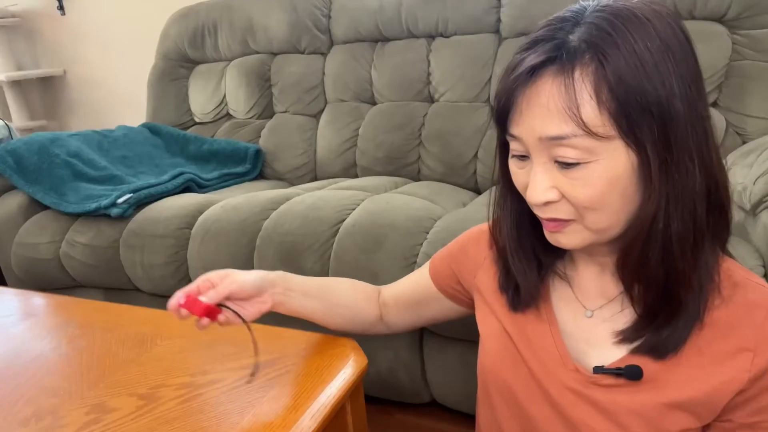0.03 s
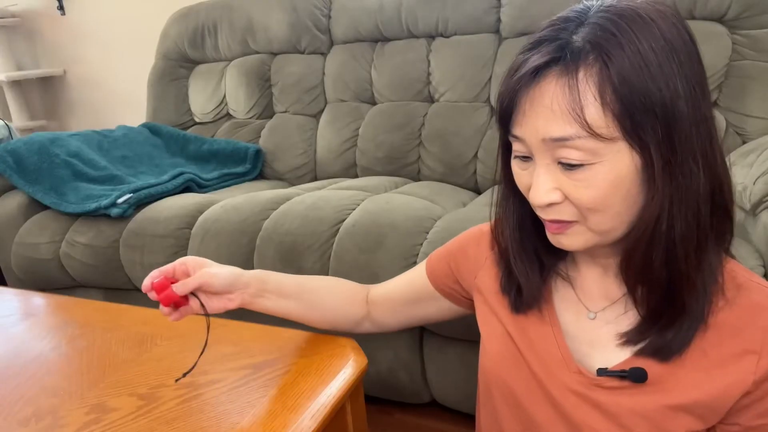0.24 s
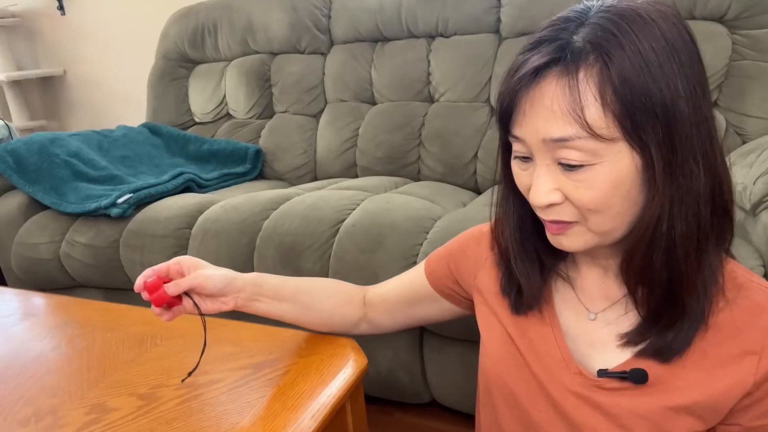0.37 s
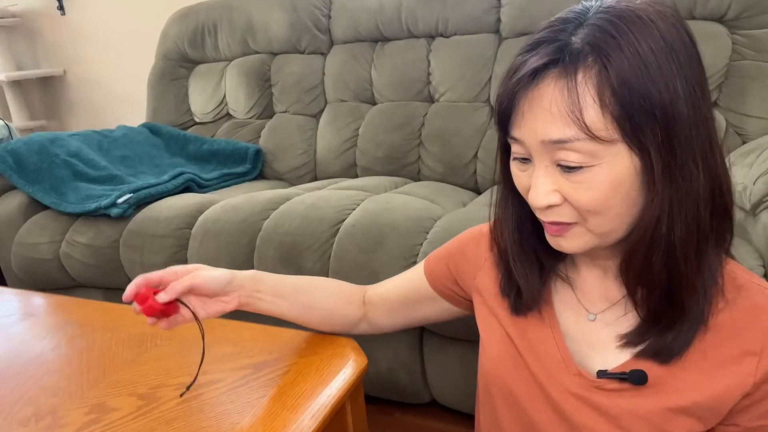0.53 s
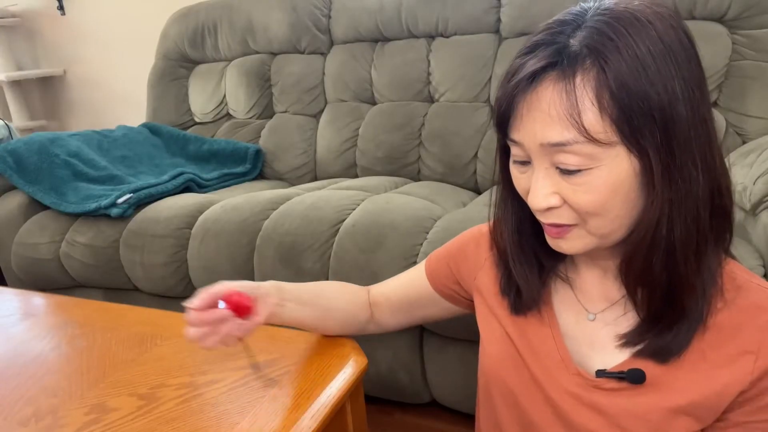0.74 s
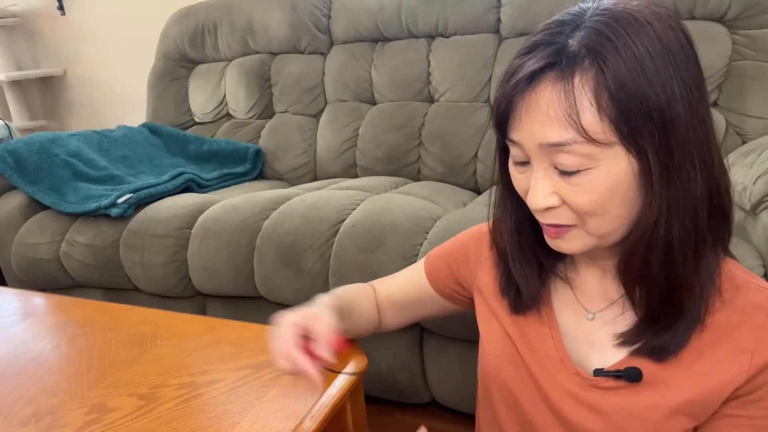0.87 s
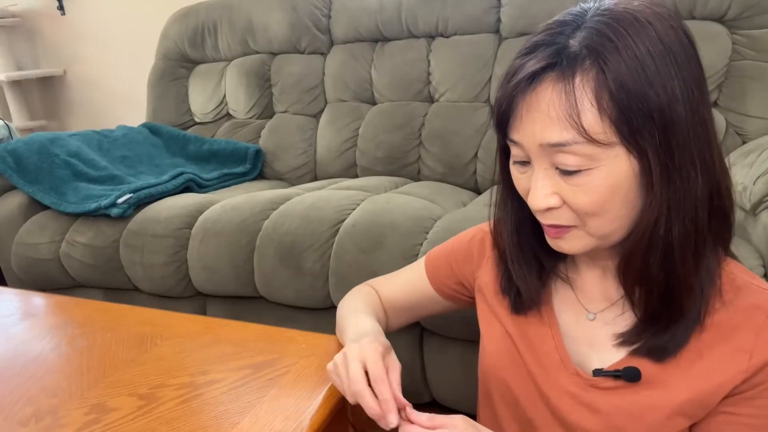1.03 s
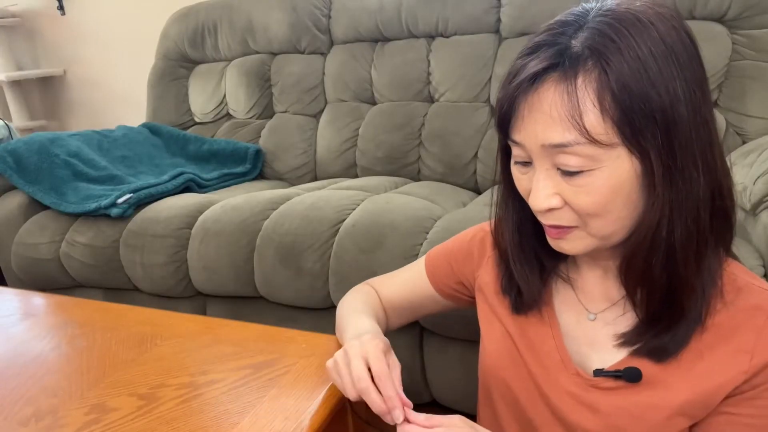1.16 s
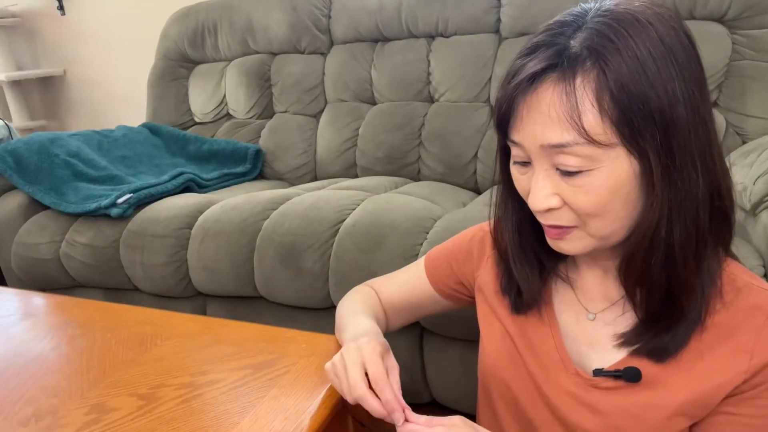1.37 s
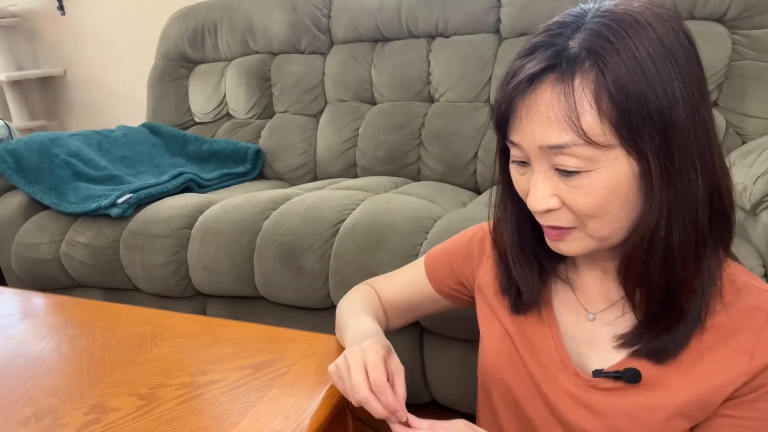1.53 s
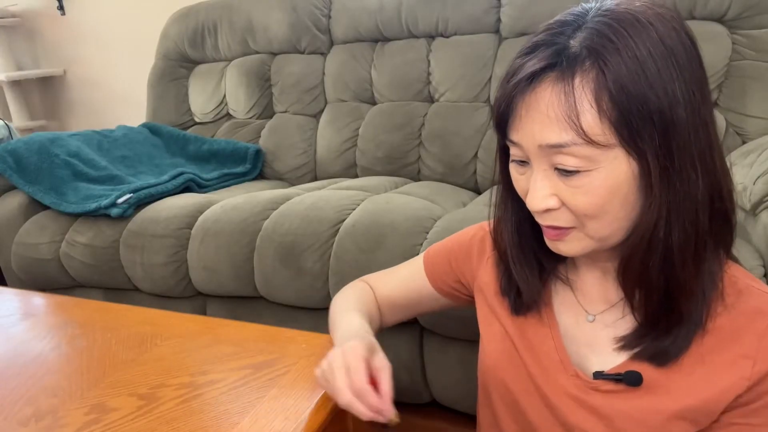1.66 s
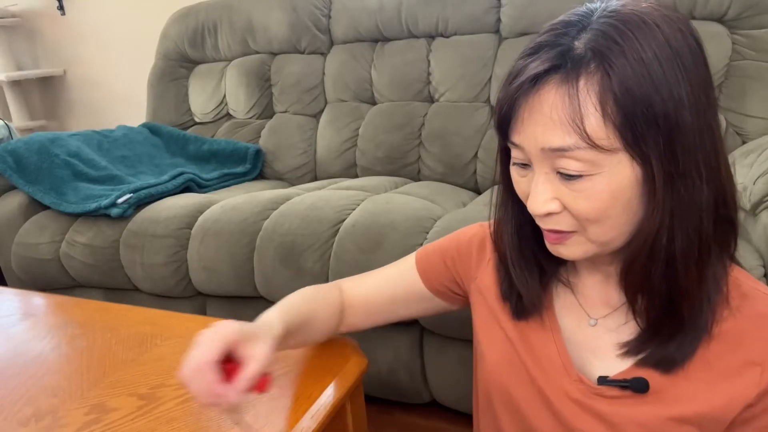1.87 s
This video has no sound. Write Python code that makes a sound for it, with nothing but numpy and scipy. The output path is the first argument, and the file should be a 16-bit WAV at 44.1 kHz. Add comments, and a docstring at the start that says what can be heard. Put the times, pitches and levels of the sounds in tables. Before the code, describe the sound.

A hand clicker snaps once, loud and sharp, close to the microphone, then springs back with a softer click. Faint handling ticks and a slight clothing rustle follow over a low hum in a quiet living room.

```python
"""A hand clicker is pressed and let go, close to the microphone in a quiet living room.
Its steel leaf buckles with a snap that overloads the recorder, then springs back more softly. Each snap
excites damped modes of the leaf and its case, and the room answers with echoes and reverberation.
Small ticks of handling, one soft boom and a faint rustle of arm movement lie over a low rumble and hum."""
import sys
import numpy as np
from scipy import signal
from scipy.fft import irfft
from scipy.io import wavfile
from scipy.ndimage import uniform_filter1d, minimum_filter1d

SR = 44100
rng = np.random.default_rng(int(sys.argv[2]) if len(sys.argv) > 2 else 0)


def generate_wav(sig):
    """Save sig (samples, or channels by samples) to the path in sys.argv[1] as 16-bit PCM at SR."""
    pcm = np.round(np.clip(np.atleast_2d(sig).T, -1, 1) * 32767).astype(np.int16)
    wavfile.write(sys.argv[1], SR, pcm)


N = 83790

# spectrum of the room noise: frequency_hz, relative_db
FLOOR_SPECTRUM = [(10, 2.5), (22, -11.5), (31, 7.5), (48, -15.5), (62, -17.5), (78, -17.5), (100, -28.5),
                  (200, -32), (400, -39.5), (800, -49.5), (2000, -59), (6000, -59), (15500, -62)]
# envelope of the deep rumble: time_s, level_db
RUMBLE_ENVELOPE = [(0, -28), (.2, -29), (.4, -40), (.55, -55), (.85, -49.5), (1.0, -35.5), (1.1, -59),
                   (1.9, -69)]
# steady tones of the hum: pitch_hz, level_db
HUM_TONES = [(79, -67), (118, -68), (239, -76), (358, -79), (414.5, -81)]
# envelope of the rustle of arm and clothes: time_s, level_db
RUSTLE_ENVELOPE = [(0, -67.5), (.55, -73), (.75, -64), (.9, -58.5), (1.0, -69), (1.15, -75), (1.41, -74.5),
                   (1.47, -64.5), (1.62, -63), (1.72, -66), (1.9, -72)]
# spectrum of sliding cloth: frequency_hz, relative_db
CLOTH_SPECTRUM = [(80, -4.5), (250, 4.5), (620, 1), (1300, -8), (2000, -8.5), (3000, -14), (8000, -16.5),
                  (15500, -21.5)]
# handling ticks, with noisy resonance, scrape and send to the walls relative to the pure ring:
# start_s, level_db, ring_hz, resonance_hz, resonance_db, t60_s, scrape_db, wall_db
HANDLING_TICKS = [(.0882, -62, 2250, 8100, 6, 0.017, -1, -8), (.0932, -47.5, 4150, 8160, -3, .016, -3, -7),
                  (.0936, -49.5, 2320, 9760, 1, .016, -13, -19),
                  (.1612, -54, 2300, 9240, 2.5, .014, -3, -11), (0.6968, -56, 1650, 6650, 2, .012, 0, -10),
                  (0.7019, -37, 3416, 5220, -3.5, 0.019, -6, 2),
                  (.7956, -43, 5050, 7190, 6.5, 0.013, -3.5, -11.5),
                  (1.008, -61.5, 2100, 13800, -2, .025, -6, 6), (1.048, -66, 1850, 13800, 2, .02, 1, -6.5),
                  (1.2725, -47.5, 1520, 1130, -5, 0.021, -15, -15),
                  (1.273, -49, 575, 3536, -11.5, 0.025, -23, -7.5),
                  (1.807, -60, 2010, 3390, 1.5, 0.041, 0, -5)]
# spectrum of the scrape in a tick: frequency_hz, relative_db
SCRAPE_SPECTRUM = [(300, -7), (1500, -11.5), (3500, 2.5), (7500, -3.5), (10000, -11.5), (16000, -18.5)]
# first reflections from table and walls: delay_s, gain_db
EARLY_ECHOES = [(.0063, -20), (0.01, -17), (.0138, -24), (.0218, -22.5), (.0272, -22)]
# reverberation by band: frequency_hz, gain_db, t60_s
ROOM_BANDS = [(300, -18.5, .3), (995, -13.5, .3), (2200, -9.5, 0.56), (3430, -9, .56), (4200, -9, 0.64),
              (6002, -12, .5), (10197, -10, .42), (11600, -14, 0.3), (15500, -13, .28)]
# modes of leaf and case as the leaf buckles: pitch_hz, relative_db, t60_s
BUCKLING_MODES = [(2151, -11.5, 0.024), (2345, -4.5, 0.019), (3566, -7, 0.017), (5090, -9, .012),
                  (5877, -7.5, 0.011), (6138, 0, .009), (7360, -10.5, .009), (8180, -11.5, .009),
                  (9130, -11.5, 0.0041), (9962, 3, 0.0085), (11716, -6.5, 0.0062), (12625, -6.5, .007),
                  (13700, -12, .008), (15440, -9, .007)]
# spectrum of the crack on the direct path: frequency_hz, relative_db
CRACK_SPECTRUM = [(150, -26), (600, -22.5), (1400, -21.5), (1900, -3.5), (2400, 0.5), (4300, 0),
                  (7000, -0.5), (10300, -1.5), (13000, -8), (16000, -4)]
# spectrum of the crack summed over all directions, as it reaches the walls: frequency_hz, relative_db
WALL_CRACK_SPECTRUM = [(300, -24.5), (1250, -18.5), (1850, -1), (2300, 4), (2900, -7.5), (3450, 4.5),
                       (4200, -3.5), (5200, 1.5), (6150, 3.5), (6900, -1), (9000, 0), (10000, 4),
                       (11000, -1), (13000, -3), (15600, -3)]
# modes of leaf and case as the leaf springs back: pitch_hz, relative_db, t60_s
RETURN_MODES = [(2260, -9, .015), (2957, -6.5, 0.021), (3660, -5.5, 0.012), (4570, -2.5, 0.0074),
                (5370, 1, 0.011), (5870, -1, 0.0091), (6900, -2, 0.01), (9500, -0.5, 0.0093),
                (10150, -6.5, 0.011), (14400, -8, 0.0093), (15450, -3, .011)]


def amp(db):
    """Amplitude ratio: a factor of ten for every 20 dB."""
    return 10 ** (np.asarray(db) / 20)


def unit(x):
    """Normalisation to rms 1."""
    return x / np.sqrt(np.mean(x ** 2) + 1e-20)


def spectrum_at(points, hz):
    """Interpolation on a log-frequency axis."""
    frequencies, values = np.transpose(points)
    return np.interp(np.log(hz + 1), np.log(frequencies + 1), values)


def envelope(points):
    """Gain over time, interpolated in decibels."""
    return amp(np.interp(np.arange(N) / SR, *np.transpose(points)))


def add(mix, start_s, sound):
    """Superposition: a sound joins the mix at start_s."""
    part = mix[max(round(start_s * SR), 0):][:len(sound)]
    part += sound[:len(part)]


def noise(gain_at, size):
    """Random-phase synthesis: noise of rms 1 with a spectrum shaped by gain_at(hz)."""
    hz = np.fft.rfftfreq(size, 1 / SR)
    return unit(irfft(gain_at(hz) * np.exp(2j * np.pi * rng.random(len(hz))), size))


def coloured_noise(spectrum, size):
    """Spectral shaping: noise of rms 1 that follows a table in decibels."""
    return noise(lambda hz: amp(spectrum_at(spectrum, hz)), size)


def rumble(pitch_hz=30.4, drift_hz=1.61, wobble_db=2.5, wobble_hz=4.5):
    """Slow random modulation of pitch and level makes a deep tone lumpy as it swells and fades."""
    drift, lumps = (noise(lambda hz: np.exp(-hz / wobble_hz) * (hz > 0), N) for _ in range(2))
    cycles = np.cumsum(pitch_hz + drift_hz * drift) / SR
    return envelope(RUMBLE_ENVELOPE) * amp(wobble_db * lumps) * np.sin(2 * np.pi * cycles)


def hum():
    """A line spectrum: faint steady sinusoids, each at a random phase."""
    t = np.arange(N) / SR
    return sum(np.sqrt(2) * amp(db) * np.sin(2 * np.pi * (hz * t + rng.random())) for hz, db in HUM_TONES)


def room_noise(level_db=-41.5):
    """Stationary broadband noise, with most of its power in the bass."""
    return amp(level_db) * coloured_noise(FLOOR_SPECTRUM, N)


def rustle(grain_db=1):
    """Friction noise: cloth slides in small uneven grains as the arm moves."""
    grain = unit(uniform_filter1d(rng.standard_normal(N), size=250))
    return envelope(RUSTLE_ENVELOPE) * unit(coloured_noise(CLOTH_SPECTRUM, N) * amp(grain_db * grain))


def boom(pitch_hz=239.4, length_s=.12, level_db=-57.5):
    """A tone pulse: a faint hollow sinusoid swells and dies under a half-sine envelope."""
    t = np.arange(0, length_s, 1 / SR)
    return amp(level_db) * np.sin(np.pi * t / length_s) * np.sin(2 * np.pi * pitch_hz * t)


def tick(level_db, ring_hz, resonance_hz, resonance_db, t60_s, scrape_db, wall_db):
    """Impact excitation: pure ring, noisy resonance and scrape die together. Gives (direct, to walls)."""
    t = np.arange(2048) / SR
    half_width = .076  # of the resonance, as a share of its pitch
    ring = np.sin(2 * np.pi * ring_hz * t)
    resonance = noise(lambda hz: 1 / (1 + ((hz / resonance_hz - 1) / half_width) ** 2), len(t))
    scrape = coloured_noise(SCRAPE_SPECTRUM, len(t))
    decay = amp(level_db - 60 * t / t60_s)
    direct = decay * (ring + amp(resonance_db) * resonance + amp(scrape_db) * scrape)
    # the walls receive a share of the whole tick and more of its ring
    return direct, amp(-17.5) * direct + amp(wall_db) * decay * ring


def reflections(sound, low_cut_hz=1820):
    """Specular reflection: table and walls return delayed copies, thin in the bass."""
    bright = signal.sosfilt(signal.butter(2, low_cut_hz, "high", fs=SR, output="sos"), sound)
    echoes = np.zeros(N)
    for delay_s, gain_db in EARLY_ECHOES:
        add(echoes, delay_s, amp(gain_db) * bright)
    return echoes


def reverberation(sound, delay_s=.003, early_db=-4.5, early_t60_s=.1):
    """A diffuse field: quick early scatter and a tail that decays exponentially in each band."""
    taps = rng.choice([-1., 1.], SR) / np.sqrt(SR)
    hz, t, bands = signal.stft(taps, SR, nperseg=256)
    rows = np.array(ROOM_BANDS)
    gain_db = spectrum_at(rows[:, :2], hz)[:, None]
    t60_s = spectrum_at(rows[:, ::2], hz)[:, None]
    gain = amp(gain_db) * np.sqrt(np.log(10 ** 6) / t60_s)  # tail energy is independent of decay time
    decay = np.hypot(amp(-60 * t / t60_s), amp(early_db - 60 * t / early_t60_s))
    response = np.zeros(SR)
    add(response, delay_s, signal.istft(bands * gain * decay, SR, nperseg=256)[1])
    return signal.fftconvolve(sound, response)[:N]


def minimum_phase_click(spectrum, size):
    """Minimum phase packs a given spectrum into the earliest possible pulse, here of energy 1."""
    log_gain = np.log(amp(spectrum_at(spectrum, abs(np.fft.fftfreq(size, 1 / SR)))))
    click = np.fft.ifft(np.exp(np.conj(signal.hilbert(log_gain)))).real
    return click / np.linalg.norm(click)


def snap(modes, ring_db, crack_db, knock_db):
    """Snap-through buckling: the leaf cracks and rings, its case knocks. Gives (direct, to walls)."""
    rise_s, ring_hold_s = .0007, .0015
    crack_hold_s, crack_t60_s = .0025, .018
    knock_hz, knock_s = 963, .003  # the hollow plastic case
    t = np.arange(2048) / SR
    rise = np.minimum(t / rise_s, 1)
    free_s = np.maximum(t - ring_hold_s, 0)
    partials = sum((-1) ** k * amp(db - 60 * free_s / t60_s) * np.sin(2 * np.pi * hz * t)
                   for k, (hz, db, t60_s) in enumerate(modes))
    ring = amp(ring_db) * rise * partials
    crack_decay = amp(-60 * np.maximum(t - crack_hold_s, 0) / crack_t60_s)
    crack = amp(crack_db) * rise * crack_decay * coloured_noise(CRACK_SPECTRUM, len(t))
    knock_pulse = np.sin(np.pi * np.minimum(t / knock_s, 1)) ** 2
    knock = amp(knock_db) * knock_pulse * np.sin(2 * np.pi * knock_hz * t)
    # directivity: the leaf beams its ring forward, so less of it reaches the walls
    wall_ring = amp(-11.5) * ring
    wall_crack = amp(5) * np.linalg.norm(crack) * minimum_phase_click(WALL_CRACK_SPECTRUM, len(t))
    return ring + crack + knock, wall_ring + wall_crack


def scene(press_s=.2295, release_s=.4333, boom_s=.055):
    """Direct, reflected and reverberant sound of the snaps and ticks add to the quiet background."""
    press = snap(BUCKLING_MODES, ring_db=-5, crack_db=-8, knock_db=-17)
    release = snap(RETURN_MODES, ring_db=-29.5, crack_db=-32.5, knock_db=-40)
    events = [(press_s, press, 0), (release_s, release, -4.5)]  # start_s, sound pair, wall_db
    events += [(start_s, tick(*settings), 0) for start_s, *settings in HANDLING_TICKS]
    near, walls = np.zeros((2, N))
    for start_s, (direct, to_walls), wall_db in events:
        add(near, start_s, direct)
        add(walls, start_s, amp(wall_db) * to_walls)
    mix = near + reflections(near) + reverberation(walls) + rumble() + hum() + room_noise() + rustle()
    add(mix, boom_s, boom())
    return mix[None]


def record(dry, ceiling=1.4, limiter_s=.0003, cutoff_hz=15850):
    """Peak limiting holds the loud snap to a ceiling above full scale; a low-pass limits the band."""
    span = round(limiter_s * SR)
    needed_gain = ceiling / np.maximum(abs(dry), ceiling)
    gain = uniform_filter1d(minimum_filter1d(needed_gain, span), span)
    low_pass = signal.firwin(255, cutoff_hz, window=("kaiser", 8), fs=SR)
    return signal.oaconvolve(dry * gain, low_pass[None], "same")


dry = scene()
out = record(dry)
generate_wav(out)
```